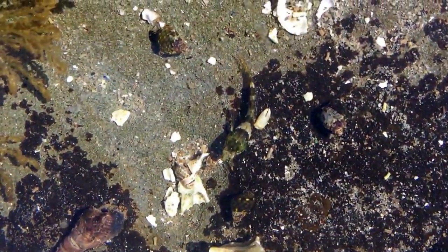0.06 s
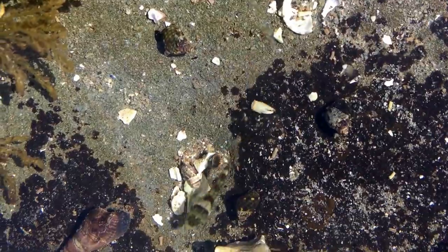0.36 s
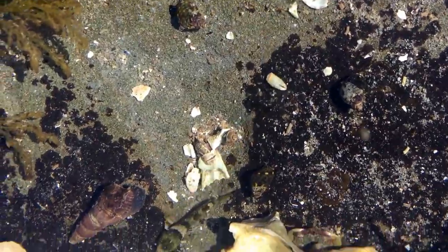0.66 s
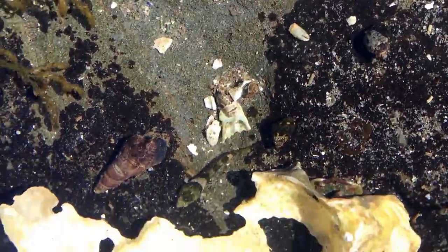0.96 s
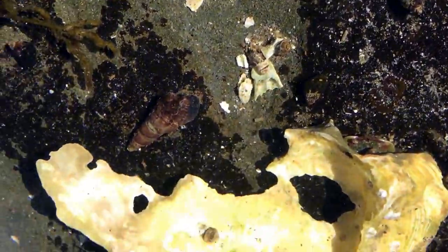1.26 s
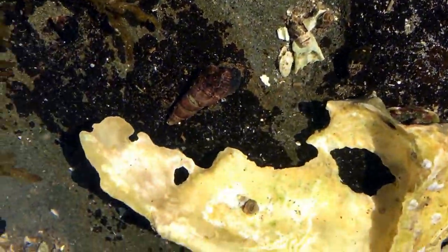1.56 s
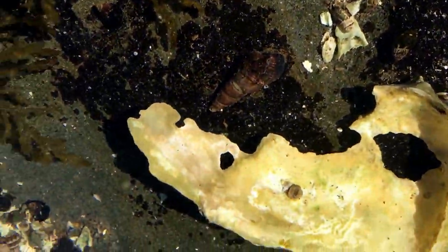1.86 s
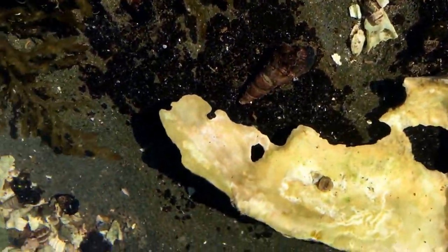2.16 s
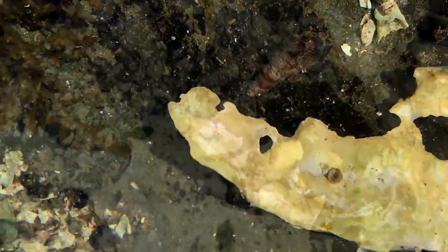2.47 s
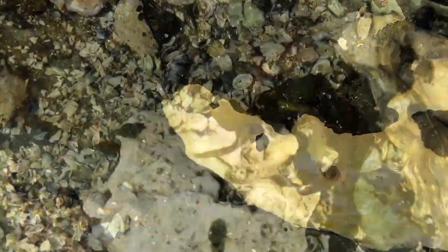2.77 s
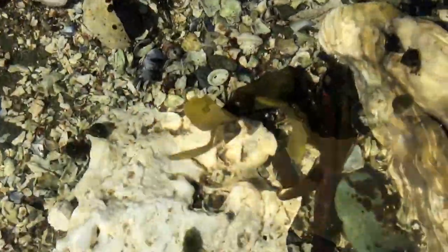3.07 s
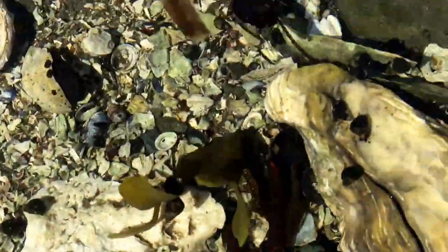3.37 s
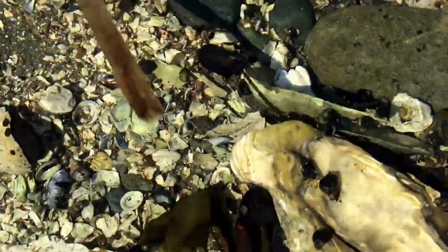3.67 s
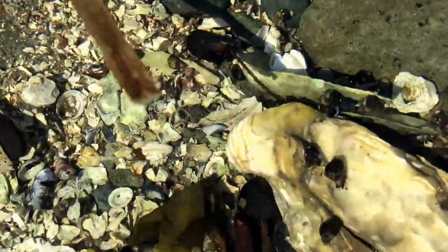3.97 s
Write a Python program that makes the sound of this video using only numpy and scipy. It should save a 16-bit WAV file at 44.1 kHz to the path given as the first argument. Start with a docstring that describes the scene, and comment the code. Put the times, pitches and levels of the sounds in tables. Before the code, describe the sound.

Sparse shell clacks and small gravel ticks sound near the microphone over a quiet shoreline wash and low wind rumble. Two dull, faint bangs come from far away. Later the wind grows stronger, grit scrapes and shells clack again.

```python
"""Shore at low tide: shells and gravel, close by.
Hollow shells clack and ring briefly, small pieces tick, grit scrapes.
Light wind buffets the microphone. Two far bangs roll away over a quiet wash.
The sound cuts out once for an instant, with a click at each end of the gap."""
import sys
import numpy as np
from scipy import signal
from scipy.fft import rfft, irfft
from scipy.io import wavfile

SR = 44100
rng = np.random.default_rng(int(sys.argv[2]) if len(sys.argv) > 2 else 0)


def dump(signal):
    """Clip the signal to [-1, 1] and save it as 16-bit WAV at the path in sys.argv[1]."""
    limited = np.clip(np.atleast_2d(signal).T, -1, 1)
    pcm = np.round(limited * 32767).astype(np.int16)
    wavfile.write(sys.argv[1], SR, pcm)


N = 176400

# contact noise spectrum: f/Hz, level/dB
CONTACT_SPECTRUM = [(300, -27), (1000, 4), (1900, 6), (3000, -4), (5000, -10.5), (6500, 0.5), (8200, -6.5),
                    (9700, -2.5), (10600, -7.5), (12000, -6), (15000, -2.5)]


def amp(db):
    """dB to gain."""
    return 10 ** (np.asarray(db) / 20)


def unit(x):
    """Scale to rms 1."""
    return x / np.sqrt(np.mean(x ** 2) + 1e-20)


def peaked(x):
    """Scale to peak 1."""
    return x / (abs(x).max() + 1e-20)


def add(mix, at_s, sound):
    """Mix in at a time; overhang is dropped."""
    start = round(at_s * SR)
    sound = sound[max(-start, 0):]
    part = mix[max(start, 0):][:len(sound)]
    part += sound[:len(part)]


def level(curve):
    """Gain per sample from points t/s, level/dB."""
    return amp(np.interp(np.arange(N) / SR, *np.transpose(curve)))


def fade(t, t60_s):
    """Exponential decay."""
    return np.exp(-np.log(1000) * t / t60_s)


def colour(x, spectrum):
    """Filter by points f/Hz, level/dB."""
    hz, db = np.transpose(spectrum)
    bins_hz = np.fft.rfftfreq(len(x), 1 / SR) + 1
    return irfft(rfft(x) * amp(np.interp(np.log(bins_hz), np.log(hz), db)), len(x))


def noise(count):
    """Flat-spectrum noise, rms 1."""
    return unit(irfft(np.exp(2j * np.pi * rng.random(count // 2 + 1)), count))


def edge(x, hz, kind, order=2):
    """Butterworth high- or low-pass."""
    return signal.sosfilt(signal.butter(order, min(hz, SR / 2 - 100), kind, fs=SR, output="sos"), x)


def shore_wash():
    """Steady, quiet noise of the shore."""
    # wash spectrum: f/Hz, level/dB
    spectrum = [(20, -14.5), (70, 12.5), (150, 6.5), (300, -0.5), (600, -6.5), (1000, -4), (1500, -13),
                (2200, -16.5), (3200, -24), (5000, -27.5), (6300, -26), (8200, -30.5), (9600, -28.5),
                (10500, -34), (12000, -30), (15500, -37)]
    return amp(db=-59) * unit(colour(rng.standard_normal(N), spectrum))


def far_bangs():
    """Dull distant bangs, each with a long rolling echo."""
    # bangs: t/s, level/dB, echo level/dB
    bangs = [(.917, -44.5, -57), (1.866, -53, -88.5)]
    # bang and echo spectrum: f/Hz, level/dB
    spectrum = [(80, -11.5), (250, 7), (500, 7), (900, 6.5), (1300, -6.5), (2000, -25), (4000, -32),
                (9000, -52)]
    echo_rise_s = 0.097
    out, t = np.zeros(N), np.arange(N) / SR
    for at_s, db, echo_db in bangs:
        direct = amp(db) * fade(t, t60_s=0.12)
        echo = amp(echo_db) * np.minimum(t / echo_rise_s, 1) * fade(t, t60_s=3.8)
        add(out, at_s, noise(N) * (direct + echo))
    return colour(out, spectrum) / np.std(colour(noise(N), spectrum))


def wind_rumble():
    """Continuous low wind noise at the microphone."""
    # wind envelope: t/s, level/dB
    envelope = [(0, -42.5), (.1, -37.5), (.2, -42.5), (.28, -52.5), (.45, -44), (.6, -58), (.85, -53),
                (1.0, -55.5), (1.15, -39), (1.22, -54), (1.28, -40.5), (1.4, -54.5), (1.6, -42.5),
                (1.9, -44.5), (2.3, -46), (2.75, -47.5), (2.83, -32.5), (3.05, -35), (3.22, -39.5),
                (3.45, -37.5), (3.6, -36), (3.84, -39), (4, -28)]
    # rumble spectrum: f/Hz, level/dB
    spectrum = [(20, -15.5), (35, -33.5), (55, 2.5), (75, 0.5), (110, -5.5), (160, -11.5), (250, -23),
                (400, -32.5), (800, -35.5), (2000, -93.5)]
    return level(envelope) * unit(colour(noise(N), spectrum))


def wind_gusts():
    """Short gusts: an eddy of a few swings in broad turbulence."""
    # gusts: centre t/s, half-width/s, level/dB, corner f/Hz
    gusts = [(.035, 0.017, -34, 125.2), (.06, 0.023, -30.5, 165), (.145, 0.017, -38.5, 190.2),
             (0.338, 0.013, -37, 170), (0.386, 0.031, -32.5, 148.4), (.435, 0.024, -35.5, 158.8),
             (0.47, 0.029, -32, 118.3), (.535, .025, -39.5, 91.6), (1.055, 0.041, -31.5, 115.4),
             (1.279, 0.024, -39.5, 124.4), (1.457, 0.017, -36, 152.6), (1.487, 0.015, -30, 179.3),
             (1.502, 0.023, -30.5, 109.4), (1.552, 0.013, -34.5, 167.5), (1.652, 0.027, -36, 118.1),
             (1.699, 0.022, -32, 87.7), (2.137, 0.022, -34.5, 78.3), (2.478, 0.014, -32, 137.7),
             (2.552, 0.014, -32, 120.2), (2.63, 0.025, -34.5, 123.2), (2.825, 0.02, -32.5, 163.8),
             (2.856, 0.022, -22, 178.9), (2.91, 0.068, -33.5, 128.4), (2.964, 0.031, -33.5, 260),
             (2.997, 0.021, -21, 183.5), (3.057, 0.028, -35.5, 147.5), (3.164, 0.028, -27.5, 159.4),
             (3.512, 0.013, -26, 79.36), (3.66, 0.066, -33.5, 106.9), (3.782, 0.035, -35.5, 148.4),
             (3.911, 0.028, -31.5, 137.8), (3.935, 0.027, -33.5, 96.7), (3.983, 0.043, -28, 176)]
    low_ratio, eddy_ratio = 0.37, 0.78  # re corner
    rolloff_order, wander_depth, turbulence_db = 2.755, 0.2257, -2
    out, t = np.zeros(N), np.arange(SR // 4) / SR
    centre_s, hz = t.mean(), np.fft.rfftfreq(len(t), 1 / SR) + 1
    for at_s, half_width_s, db, corner_hz in gusts:
        swell = np.exp(-2 * ((t - centre_s) / half_width_s) ** 2)
        low_loss = 1 + (low_ratio * corner_hz / hz) ** 8
        high_loss = 1 + (hz / corner_hz) ** (2 * rolloff_order)
        turbulence = unit(irfft(rfft(noise(len(t)) * swell) / np.sqrt(low_loss * high_loss), len(t)))
        wander = np.exp(wander_depth * unit(edge(noise(len(t)), corner_hz, "low")))
        cycles = np.cumsum(eddy_ratio * corner_hz * wander) / SR + rng.random()
        eddy = unit(swell * np.cos(2 * np.pi * cycles))
        gust = unit(eddy + amp(turbulence_db) * turbulence) * np.sqrt(np.mean(swell ** 2))
        add(out, at_s - centre_s, amp(db) * gust)
    return out


def wind_buffets():
    """Single pressure spikes, swung back by the microphone's low cut."""
    # spikes: t/s, peak level/dB, half-width/s
    buffets = [(0.191, -25.5, 0.0027), (1.546, -29, 0.0016), (2.9532, -17, 0.00079), (3.145, -18.5, 0.0018),
               (3.588, -22.5, 0.0017), (3.744, -18.5, 0.0022)]
    out, t = np.zeros(N), np.arange(SR // 10) / SR
    for at_s, db, half_width_s in buffets:
        spike = 1 / (1 + ((t - t.mean()) / half_width_s) ** 2)
        add(out, at_s - t.mean(), amp(db) * peaked(edge(spike, hz=62.6, kind="high", order=3)))
    return out


def stone_scatter(x):
    """Direct sound plus scatter from stones: near ones quick, far ones fainter, duller, longer."""
    t = np.arange(SR // 3) / SR
    rise_s = 0.0029
    onset = np.clip(t / rise_s - .5, 0, 1)

    def tail(db, t60_s, top_hz):
        envelope = onset * fade(t, t60_s)
        scatter = edge(noise(len(t)) * envelope, top_hz, "low", order=1)
        return amp(db) * scatter / np.linalg.norm(envelope)

    near = tail(db=-12, t60_s=.04, top_hz=6230)
    far = tail(db=-22, t60_s=.2, top_hz=2300)
    return x + signal.oaconvolve(x, near + far)[:N]


def gravel_scrape():
    """Dense tiny slips of shell grit, each a noise burst."""
    # shifting gravel: t/s, level/dB
    envelope = [(0, -78.5), (.2, -68.5), (.3, -81.5), (.93, -84), (1.0, -66), (1.08, -73), (1.2, -85),
                (2.38, -89), (2.62, -71), (2.74, -70), (2.82, -85), (2.95, -88), (2.995, -66), (3.02, -91),
                (3.25, -108), (3.28, -62.5), (3.30, -76), (3.335, -59), (3.37, -76), (3.41, -64),
                (3.43, -66), (3.478, -54.5), (3.51, -83), (3.82, -80), (3.93, -64.5), (4, -78)]
    # grit spectrum: f/Hz, level/dB
    spectrum = [(500, -4.5), (1300, 4.5), (2400, 5), (4000, 1), (6500, -6.5), (8200, -11.5), (10000, -15.5),
                (16000, -19.5)]
    slips_per_s, spread_db = 780, 1.5
    slips = (rng.random(N) < slips_per_s / SR) * amp(spread_db * np.minimum(rng.exponential(1, N), 4))
    slip_decay = fade(np.arange(SR // 20) / SR, t60_s=0.011)
    grains = signal.oaconvolve(slips, slip_decay)[:N] * noise(N)
    return level(envelope) * unit(colour(grains, spectrum))


def small_ticks():
    """Small pieces meet: a broadband crack and one short ring."""
    # contacts: t/s, peak level/dB, ring f/Hz, ring trim/dB, low-pass f/Hz
    ticks = [(0.1660, -48, 6100, -4, 12100), (0.173, -40.5, 3730, -33, 7000), (0.983, -54, 4440, 5, 6000),
             (1.0020, -32, 1810, -2.5, 6950), (1.011, -42, 4400, 1, 6000),
             (1.1160, -32.5, 5500, 3.5, 10000), (1.5350, -54, 2400, 4, 8000), (1.7045, -56, 2000, 10, 3000),
             (1.8970, -58, 4300, 7, 7000), (2.499, -58, 5800, 9, 8000), (2.6010, -54.5, 4170, 1, 7000),
             (2.6871, -32.5, 2920, 0, 11000), (2.7270, -63, 4000, -2, 7000), (2.7375, -64, 4500, -2, 6000),
             (3.17, -60.5, 2350, -1, 4000), (3.2790, -47, 4200, -4, 7100), (3.2917, -56, 11200, 7, 14000),
             (3.3490, -46.5, 2500, 3, 4000), (3.3810, -57, 4000, -2, 8000), (3.413, -47, 3960, 6, 12000),
             (3.4157, -41.5, 3720, 13, 10000), (3.463, -46, 5330, 1, 8200), (3.4773, -48, 4800, 16, 11000),
             (3.4832, -35, 3770, -1.5, 7300), (3.9510, -48.5, 4030, -8, 6000)]
    out, t = np.zeros(N), np.arange(SR // 20) / SR
    decay = fade(t, t60_s=.008)
    for at_s, db, ring_hz, ring_db, top_hz in ticks:
        crack = edge(colour(noise(len(t)), CONTACT_SPECTRUM) * decay, hz=800, kind="high")
        ring = np.sin(2 * np.pi * ring_hz * t) * decay
        tick = unit(crack) + .5 * amp(ring_db) * unit(ring)
        add(out, at_s, amp(db) * peaked(edge(tick, top_hz, "low")))
    return out


def shell_clacks():
    """A struck hollow shell rings briefly and rebounds once; the contact sets which modes sound."""
    # strikes: t/s, level/dB, pitch ratio, high-pass f/Hz, low-pass f/Hz,
    # rebound delay/s, rebound/dB re strike, snap/dB re body
    strikes = [(0.1179, -22.5, 0.97, 1660, 4570, .0023, -9, -26),
               (0.1262, -32, 1.02, 1540, 1890, 0.0011, -15, -34),
               (3.6468, -17, 1.012, 860, 2210, 0.0019, 1.5, -22.5),
               (3.8578, -29.5, 1.1, 2000, 2250, 0.00117, -23, -36),
               (3.9290, -21, 1.05, 1940, 5000, .0021, -15, -15)]
    # shell modes: f/Hz, level/dB, T60/s
    modes = [(974, -5, 0.013), (1080, -15, 0.011), (1466, -13, 0.0075), (1612, -3, 0.012),
             (1864, -2.5, 0.017), (2010, 1.5, 0.0082), (2390, -8.5, 0.014), (2907, -11, 0.021),
             (3246, -20, 0.0038), (3370, -6.5, 0.0094), (4490, -13.5, 0.017), (5330, -8, 0.009),
             (6250, -6.5, .008)]
    ring_rise_s, snap_rise_s = 0.00083, 0.0012
    out, t = np.zeros(N), np.arange(SR // 10) / SR
    snap_envelope = np.minimum(t / snap_rise_s, 1) * fade(t, t60_s=.009)
    for at_s, db, pitch, low_hz, high_hz, rebound_s, rebound_db, snap_db in strikes:
        ring = sum(amp(mode_db) * fade(t, t60_s) * np.sin(2 * np.pi * pitch * hz * t)
                   for hz, mode_db, t60_s in modes)
        ring *= np.minimum(t / ring_rise_s, 1)
        body = peaked(edge(edge(ring, low_hz, "high", order=4), high_hz, "low", order=4))
        snap = peaked(colour(noise(len(t)), CONTACT_SPECTRUM) * snap_envelope)
        clack = amp(db) * (body + amp(snap_db) * edge(snap, low_hz, "high"))
        add(out, at_s, clack)
        add(out, at_s + rebound_s, -amp(rebound_db) * clack)
    return out


def scene():
    """Shells close by, wind at the microphone, shore behind; mono."""
    wash = shore_wash()
    shells = stone_scatter(shell_clacks() + small_ticks() + gravel_scrape())
    wind = wind_rumble() + wind_gusts() + wind_buffets()
    return (wash + far_bangs() + wind + shells)[None]


def record(dry):
    """One dropout with a click at each end, then the band limit."""
    cut_s, return_s = 2.7726, 2.7970
    cut_db, return_db, top_hz = -39, -27.5, 15900
    t = np.arange(N) / SR
    outside_s = np.maximum(cut_s - t, t - return_s)
    blend = fade(abs(outside_s), t60_s=0.017)
    click = amp(np.where(t < return_s, cut_db, return_db))
    gapped = (outside_s > 0) * (dry * (1 - blend) + click * blend)
    band_limit = signal.firwin(511, top_hz, window=("kaiser", 9), fs=SR)
    return signal.oaconvolve(gapped, band_limit[None], "same")


dry = scene()
out = record(dry)
dump(out)
```